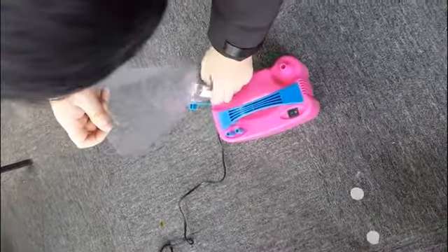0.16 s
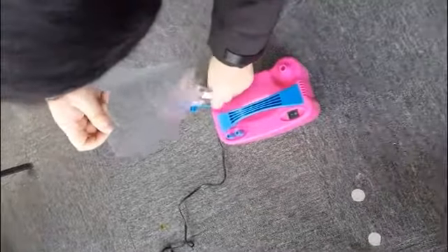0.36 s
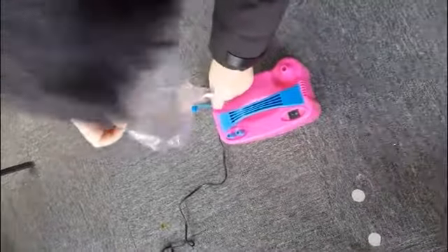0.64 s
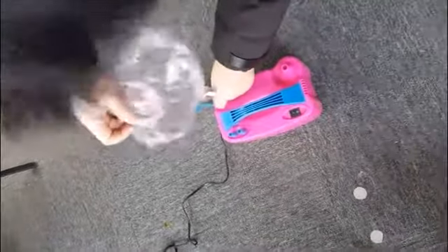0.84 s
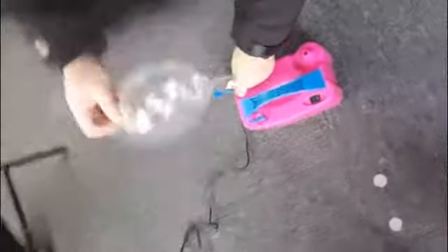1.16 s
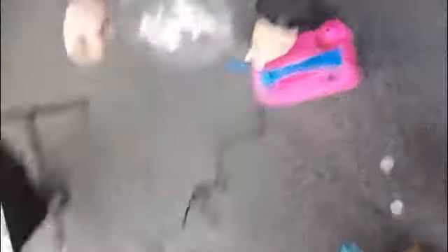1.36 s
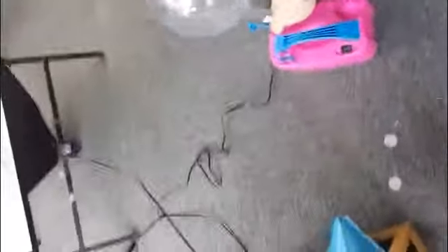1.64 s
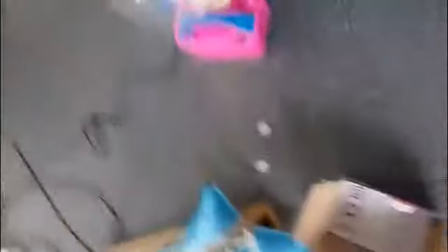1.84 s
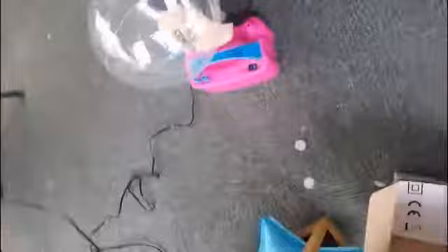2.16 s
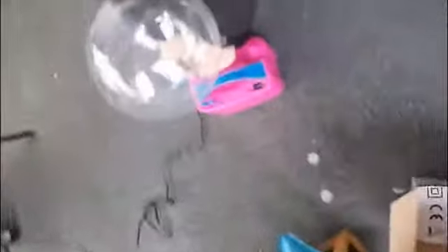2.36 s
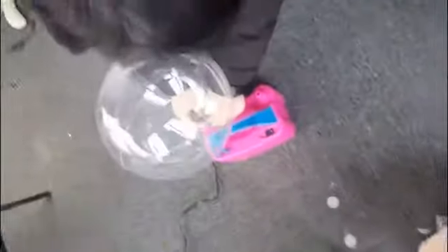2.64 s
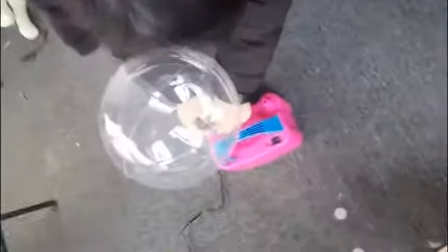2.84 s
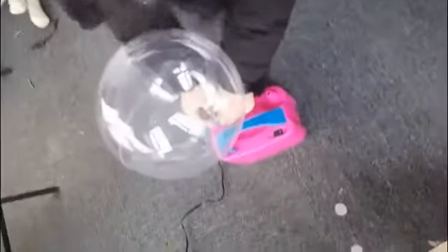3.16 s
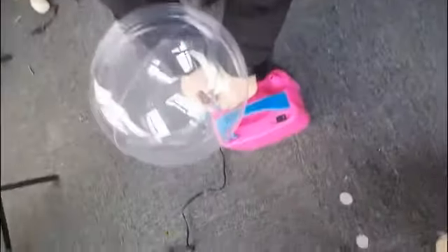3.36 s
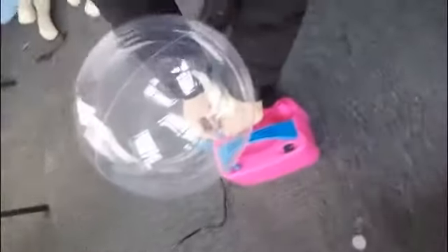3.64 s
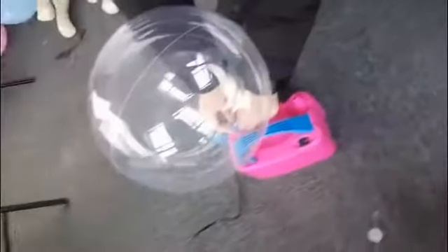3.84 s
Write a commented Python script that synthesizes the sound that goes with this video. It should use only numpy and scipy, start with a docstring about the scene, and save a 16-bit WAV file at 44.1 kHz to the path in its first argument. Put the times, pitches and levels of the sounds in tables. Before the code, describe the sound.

Electric balloon pump switches on indoors, its motor whine climbing quickly, then holding under hissing air

```python
"""A quiet room, then the click of a switch: a small electric air pump on a carpet runs up and fills
a plastic balloon. The shaft whines in sine orders locked to its speed; the air rushes as shaped noise
with a housing ring near 2 kHz, and the balloon skin flaps as short swells of that noise.
Room tone and deep bass lie beneath; the whine shifts in level and phase between left and right
as a hand-held pair of microphones moves about above the pump."""
import sys
import numpy as np
from scipy import signal
from scipy.io import wavfile
from scipy.ndimage import uniform_filter1d

SR = 44100
rng = np.random.default_rng(int(sys.argv[2]) if len(sys.argv) > 2 else 0)


def waveform_to_disk(signal):
    """Save audio, clipped to [-1, 1], as 16-bit WAV at the path in sys.argv[1]."""
    frames = np.transpose(np.atleast_2d(signal))
    scaled = np.clip(frames, -1, 1) * 32767
    samples = np.round(scaled).astype(np.int16)
    wavfile.write(sys.argv[1], SR, samples)


def gain_from_db(level_db):
    """Turn a decibel level (scalar or array-like) into a linear amplitude factor."""
    decades = np.asarray(level_db, float) / 20
    return 10 ** decades


N = 176400
T = np.arange(N) / SR  # time of each sample, s
BIN_HZ = np.fft.rfftfreq(1024, 1 / SR)  # noise spectrum bins
FRAME_S = np.arange(N // 256 + 5) * 256 / SR  # noise frame times

# Room tone spectrum: f/Hz, relative density/dB
ROOM_SHAPE = [(47, -32), (80, -7), (115, 0), (172, -10), (317, -8), (598, -15), (1260, -9), (4560, -37),
              (13600, -45), (14800, -51)]
ROOM_DB = -52.5
# Deepest bass: t/s, level/dB
DEEP_LEVEL = [(0, -56), (.8, -56), (.9, -52), (1.1, -57), (1.5, -54), (1.75, -50), (2.1, -67)]
# Deepest bass spectrum: f/Hz, relative level/dB
DEEP_SHAPE = [(20, -22), (40, -8), (58, 0), (85, -6), (120, -25), (300, -90)]
DEEP_APART = .7  # amplitude of each side's own bass, beside 1 for the bass both share

ON_S, RISE_S = 0.439, 0.008  # switch closing time and fade-in length
# Switch and jolt tones: f/Hz, starting peak level/dB, decay by 60 dB/s
CLICK_TONES = [(265, -36, 0.05), (1100, -41, .012), (2300, -43, .01)]

# Air rush before the trims below: t/s, then level/dB of rumble, middle, housing ring, hiss, top;
# ring centre f/Hz
AIR_LEVELS = [(.46, -41, -42, -44.5, -49, -72, 1880), (.52, -38, -37, -39, -36.5, -52, 2060),
              (.6, -39.5, -38.5, -39.5, -31, -40, 2030), (.7, -33.5, -36, -39.5, -29, -35, 2070),
              (.9, -31, -32.5, -35.5, -27, -31.5, 1980), (1.05, -37.5, -34.5, -38, -28.5, -30.5, 2010),
              (1.25, -39.5, -36, -40.5, -28.5, -31, 2060), (1.6, -38, -35.5, -41, -25.5, -29.5, 1960),
              (2, -34, -35, -38, -25.5, -29.5, 2040), (2.25, -35.5, -30.5, -33, -25.5, -29, 2160),
              (2.32, -37, -32.5, -29, -25, -30.5, 1950), (2.8, -36.5, -33.5, -31, -25.5, -29.5, 1920),
              (3.15, -37, -32, -29.5, -25, -29.5, 1890), (3.45, -34, -30.5, -33.5, -24.5, -28.5, 2000),
              (3.65, -34, -29, -32, -23, -30, 2100), (4, -36.5, -30.5, -30, -25, -29.5, 2150)]
# Spectra of four air regions: f/Hz, relative density/dB
RUMBLE_SHAPE = [(60, -44), (95, -12), (150, -3), (320, 1), (450, -2), (750, -5), (1500, -50)]
MIDDLE_SHAPE = [(300, -27.5), (500, -14), (800, -2), (1100, -2), (1500, -2), (2500, -11.5), (4000, -47)]
HISS_SHAPE = [(1200, -24), (2200, -5.5), (3000, -5), (4000, -7.5), (5200, -8), (7000, -10), (9000, -13.5),
              (13000, -28.5)]
TOP_SHAPE = [(5000, -42.5), (7000, -4), (8500, 2), (10000, 1.5), (11000, -1.5), (12500, 2.5), (14300, -3),
             (16000, -14.5)]
MIDDLE_TRIM_DB, RING_TRIM_DB, HISS_TRIM_DB, TOP_TRIM_DB = 2.5, 4, -1, -0.5
RING_HALF_WIDTH_HZ, RING_FLUTTER_DB = 270, .7  # 6 dB down at the half width; flutter is rms
# The balloon skin flaps open: start t/s, length t/s, level/dB, centre f/Hz, half width at -6 dB/octaves
SKIN_FLAPS = [(.72, .25, -31, 300, 1.1), (2.13, .13, -29, 680, .9)]
# Stereo likeness of the noise: f/Hz, left-right correlation/1
LIKENESS = [(60, .6), (120, .92), (240, .93), (470, .8), (930, .55), (1840, .5), (3660, .3), (7260, .05),
            (14400, 0)]
# Stereo balance of the noise: f/Hz, left over right level/dB
BALANCE = [(930, -0.5), (2320, -0.5), (5780, 0.5), (14400, 0)]
LEFT_LAG_S = 4e-5  # left noise arrives after right

# Shaft speed before waver: t/s, f/Hz
SHAFT_SPEED = [(0.46, 202.1), (0.51, 300.3), (0.58, 404.5), (0.65, 480.2), (0.74, 543.8), (0.85, 590.8),
               (0.95, 611.0), (1.05, 629.1), (1.16, 641.3), (1.28, 649.8), (1.4, 657.0), (1.55, 660.3),
               (1.74, 664.0), (2, 665.8), (2.3, 665.4), (2.6, 663.3), (3, 663.6), (3.4, 662.7),
               (3.95, 661.9)]
# Main orders before wander, as the microphones move: t/s,
# then level/dB of order 1 left, right, order 2 left, right, order 3 left, right
ORDER_LEVELS = [(0.47, -48.0, -50.0, -71.0, -69.0, -55.0, -57.0),
                (0.55, -42.0, -37.0, -46.0, -45.0, -46.0, -47.0),
                (0.6, -42.0, -36.0, -36.0, -37.0, -51.0, -49.0),
                (0.65, -40.0, -35.0, -27.0, -31.0, -32.0, -38.0),
                (0.7, -35.0, -33.0, -29.0, -37.0, -30.0, -27.0),
                (0.73, -26.0, -28.0, -35.0, -36.0, -39.0, -50.0),
                (0.76, -20.0, -24.0, -36.0, -41.0, -35.0, -54.0),
                (0.8, -29.0, -32.0, -32.0, -35.0, -50.0, -37.0),
                (0.85, -28.0, -28.0, -45.0, -29.0, -37.0, -40.0),
                (0.9, -29.0, -31.0, -33.0, -36.0, -33.0, -36.0),
                (0.95, -37.0, -42.0, -33.0, -36.0, -34.0, -34.0),
                (0.985, -27.0, -25.0, -37.0, -37.0, -35.0, -33.0),
                (1.035, -23.0, -24.0, -38.0, -38.0, -35.0, -34.0),
                (1.075, -18.0, -18.0, -37.0, -40.0, -40.0, -35.0),
                (1.11, -21.0, -20.0, -33.0, -31.0, -31.0, -33.0),
                (1.15, -15.0, -14.0, -45.0, -42.0, -42.0, -34.0),
                (1.26, -17.0, -19.0, -32.0, -29.0, -38.0, -35.0),
                (1.36, -21.0, -23.0, -36.0, -39.0, -35.0, -35.0),
                (1.46, -22.0, -32.0, -29.0, -32.0, -36.0, -29.0),
                (1.55, -22.0, -40.0, -34.0, -36.0, -35.0, -34.0),
                (1.6, -28.0, -35.0, -46.0, -35.0, -30.0, -29.0),
                (1.66, -28.0, -30.0, -34.0, -31.0, -32.0, -33.0),
                (1.78, -26.0, -28.0, -43.0, -31.0, -30.0, -31.0),
                (1.9, -23.0, -25.0, -38.0, -31.0, -34.0, -29.0),
                (2.1, -21.0, -26.0, -34.0, -29.0, -33.0, -31.0),
                (2.3, -22.0, -26.0, -36.0, -29.0, -35.0, -29.0),
                (2.5, -27.0, -26.0, -45.0, -26.0, -41.0, -24.0),
                (2.8, -27.0, -26.0, -45.0, -28.0, -46.0, -24.0),
                (3.05, -24.0, -24.0, -34.0, -26.0, -32.0, -28.0),
                (3.25, -24.0, -23.0, -34.0, -30.0, -32.0, -31.0),
                (3.45, -24.0, -25.0, -32.0, -28.0, -27.0, -36.0),
                (3.56, -25.0, -26.0, -33.0, -29.0, -28.0, -47.0),
                (3.68, -28.0, -28.0, -29.0, -26.0, -35.0, -34.0),
                (3.8, -28.0, -32.0, -31.0, -26.0, -35.0, -40.0),
                (3.9, -26.0, -29.0, -35.0, -26.0, -30.0, -31.0),
                (3.98, -28.0, -28.0, -36.0, -29.0, -30.0, -34.0)]
# Stereo phase of the main orders: t/s, then lead of left over right/rad for orders 1, 2, 3
ORDER_LEADS = [(.6, .3, -.1, 0), (1.15, -.1, 0, -.4), (1.4, 1.1, -.5, -.4), (1.5, 1.9, -3.1, -.2),
               (1.6, 3.2, -2, 0), (1.8, 5.6, -1.3, -1.3), (2.3, 5.9, -1.4, -2.6), (2.4, 6.8, -2, -3.9),
               (3, 6.9, -2.7, -5.2), (3.5, 7.2, -2.8, -5.6), (3.7, 7.5, -4.6, -6.9), (4, 7.6, -3.6, -8)]
# Faint upper orders: order/1, level at final speed/dB, rms wander/dB
UPPER_ORDERS = [(4, -46.5, 3.5), (5, -46, 3.5), (7, -46.5, 3.5), (12, -52, 3)]
# Orders cross resonances in the run-up: order/1, centre t/s, width (sigma) t/s, peak level/dB
RESONANCES = [(4, .655, .04, -31), (4, .93, .04, -37), (2, 1.035, .012, -26), (5, .67, .04, -39),
              (8, .48, .012, -39)]
WAVER_HZ, WANDER_DB = .8, .8  # rms chance movement of speed and order levels
RUN_UP_WANDER_DB, SETTLED_S = 2.8, 1.0  # extra rms break-up while the speed climbs, gone by SETTLED_S


def evened(x):
    """Scales to unit rms."""
    return x / np.sqrt(np.mean(x ** 2) + 1e-20)


def read(points, hz):
    """Reads a table on a log-frequency axis."""
    f, value = np.transpose(points)
    return np.interp(np.log(hz + 1), np.log(f + 1), value)


def curves(table, t):
    """Joins the rows of a table by straight lines, one curve per column after the time."""
    cols = np.transpose(table)
    return np.array([np.interp(t, cols[0], c) for c in cols[1:]])


def drift(t, top_hz, count):
    """Slow chance curves of unit rms, each a sum of 24 sines with random phases."""
    f = np.geomspace(top_hz / 20, top_hz, 24)
    coarse = np.arange(0, N / SR + .1, .004)
    phases = rng.random((count, 24, 1))
    waves = np.sin(2 * np.pi * (f[:, None] * coarse + phases)) / f[:, None] ** .25
    return np.array([np.interp(t, coarse, evened(w)) for w in waves.sum(1)])


def share(shape_db):
    """Power per bin that sums to one."""
    power = gain_from_db(shape_db) ** 2
    return power / power.sum(0)


def noise(power, patchy_db):
    """Stereo noise from a bins x frames power field, with patches drifting over time and pitch."""
    a, b, c, d, patches = rng.standard_normal((power.shape[1], len(BIN_HZ), 5)).T
    patches = uniform_filter1d(patches, size=3, axis=0)
    patches = evened(uniform_filter1d(patches, size=36, axis=1))
    same = np.clip(read(LIKENESS, BIN_HZ), -1, 1)[:, None]
    shared, own = a + 1j * b, c + 1j * d
    lag = np.exp(-2j * np.pi * BIN_HZ * LEFT_LAG_S)[:, None]
    z = np.array([shared * lag, same * shared + np.sqrt(1 - same ** 2) * own])
    side = np.array([.5, -.5])[:, None, None]
    z *= np.sqrt(power) * gain_from_db(patchy_db * patches + side * read(BALANCE, BIN_HZ)[:, None])
    sound = signal.istft(z, nperseg=1024, noverlap=768)[1][:, :N]
    return sound * np.sqrt(3 / 2)  # makes up for the loss where random frames overlap


def switched(t):
    """Zero until the switch closes, then a short straight rise to one."""
    return np.clip((t - ON_S) / RISE_S, 0, 1)


def room():
    """Quiet background of the room as steady shaped noise."""
    power = share(read(ROOM_SHAPE, BIN_HZ))[:, None] * np.ones(len(FRAME_S))
    return gain_from_db(ROOM_DB) * evened(noise(power, patchy_db=0.5))


def deep():
    """Deepest bass of the room and the hand: filtered noise, partly unlike left and right."""
    shape = gain_from_db(read(DEEP_SHAPE, np.fft.rfftfreq(N, 1 / SR)))
    white = rng.standard_normal((3, N))
    both, left, right = np.fft.irfft(np.fft.rfft(white) * shape, N)
    bass = evened(both + DEEP_APART * np.array([left, right]))
    return bass * gain_from_db(curves(DEEP_LEVEL, T))


def click():
    """The switch closes and the housing jolts: short sines that die away exponentially."""
    t = np.maximum(T - ON_S, 0)
    return sum(gain_from_db(db - 60 * t / t60) * np.sin(2 * np.pi * hz * t) for hz, db, t60 in CLICK_TONES)


def housing_ring(level_db, centre_hz):
    """Noise power in a resonant bell whose centre moves and whose level flutters."""
    bell_db = -20 * np.log10(1 + ((BIN_HZ[:, None] - centre_hz) / RING_HALF_WIDTH_HZ) ** 2)
    flutter_db = RING_FLUTTER_DB * drift(FRAME_S, 85, count=1)[0]
    return share(bell_db) * gain_from_db(level_db + RING_TRIM_DB + flutter_db) ** 2


def skin_flaps():
    """Noise power of the balloon skin flapping open: fluttering swells around a centre pitch."""
    power = 0
    for start, length, db, centre_hz, width in SKIN_FLAPS:
        arch = np.sin(np.pi * np.clip((FRAME_S - start) / length, 0, 1)) ** .5
        flutter = gain_from_db(db + 1.5 * drift(FRAME_S, 60, count=1)[0])
        shape_db = -6 * (np.log2((BIN_HZ + 1) / centre_hz) / width) ** 2
        power = power + share(shape_db)[:, None] * (arch * flutter) ** 2
    return power


def rush():
    """Turbulent air: noise in five regions, each on its own level, and the flapping skin."""
    low, mid, ring, hiss, top, centre_hz = curves(AIR_LEVELS, FRAME_S)
    power = housing_ring(ring, centre_hz) + skin_flaps()
    regions = [(RUMBLE_SHAPE, low), (MIDDLE_SHAPE, mid + MIDDLE_TRIM_DB),
               (HISS_SHAPE, hiss + HISS_TRIM_DB), (TOP_SHAPE, top + TOP_TRIM_DB)]
    for shape, db in regions:
        power += share(read(shape, BIN_HZ))[:, None] * gain_from_db(db) ** 2
    flicker = gain_from_db(.6 * drift(FRAME_S, 60, count=1))  # all regions together
    return noise(power * flicker ** 2, patchy_db=1.2) * switched(T)


def whine():
    """Shaft orders: sines at whole multiples of one slightly wavering rotation."""
    side = np.array([[.5], [-.5]])
    hz = curves(SHAFT_SPEED, T)[0]
    turns = np.cumsum(hz + WAVER_HZ * drift(T, 24.95, count=1)[0]) / SR

    # Main orders, breaking up while the speed climbs
    wander_db = WANDER_DB * drift(T, 30, count=6)
    climbing = np.clip((SETTLED_S - T) * 10, 0, 1)
    break_db = RUN_UP_WANDER_DB * climbing * drift(T, 120, count=6)
    gains = gain_from_db(curves(ORDER_LEVELS, T) + wander_db + break_db).reshape(3, 2, N)
    out = np.zeros((2, N))
    for k, lead in enumerate(curves(ORDER_LEADS, T)):
        out += gains[k] * np.sin(2 * np.pi * (k + 1) * turns + side * lead)

    # Upper orders grow with the square of the speed
    for order, db, wander in UPPER_ORDERS:
        gain = gain_from_db(db + wander * drift(T, 6, count=2)) * (hz / hz[-1]) ** 2
        out += gain * np.sin(2 * np.pi * (order * turns + rng.random() + .1 * side))

    # Orders swell briefly as they cross resonances
    for order, s, width, db in RESONANCES:
        swell = gain_from_db(db) * np.exp(-.5 * ((T - s) / width) ** 2)
        out += swell * np.sin(2 * np.pi * order * turns)
    return np.sqrt(2) * out * switched(T)  # sqrt(2): table levels are rms


def scene():
    """All sources together."""
    return room() + deep() + click() + rush() + whine()


def top_cut(x):
    """Nothing passes above the cut-off."""
    return signal.sosfilt(signal.butter(12, 15000, fs=SR, output="sos"), x)


def record(dry):
    """Finishes the mix with a steep low-pass at 14.3 kHz."""
    taps = signal.firwin(1023, 14300, window=("kaiser", 9), fs=SR)
    mix = signal.oaconvolve(dry, taps[None], "same")
    return top_cut(mix)


dry = scene()
out = record(dry)
waveform_to_disk(out)
```